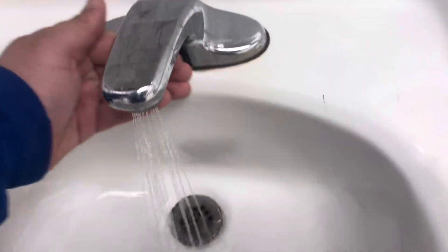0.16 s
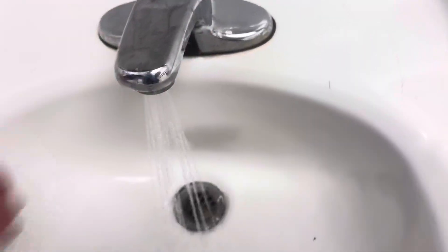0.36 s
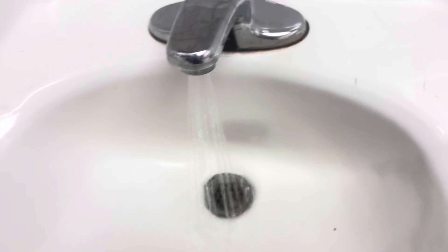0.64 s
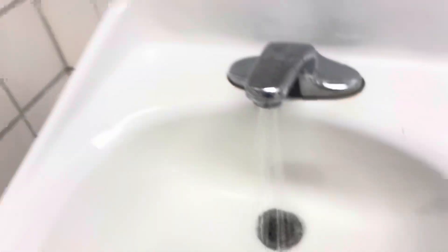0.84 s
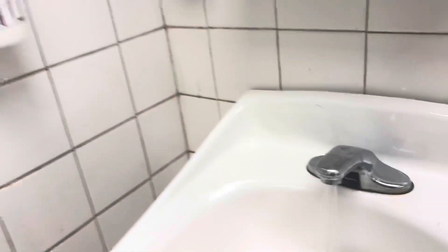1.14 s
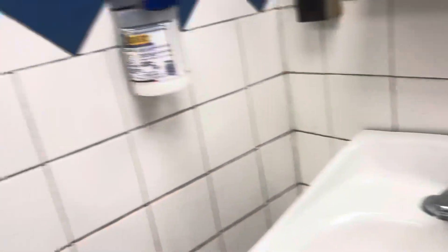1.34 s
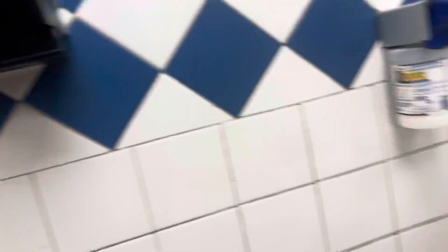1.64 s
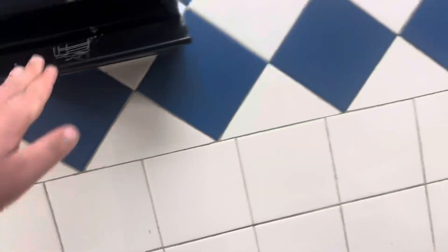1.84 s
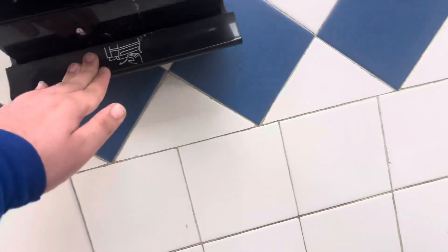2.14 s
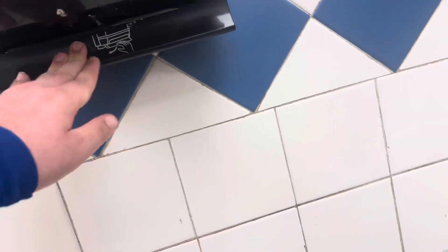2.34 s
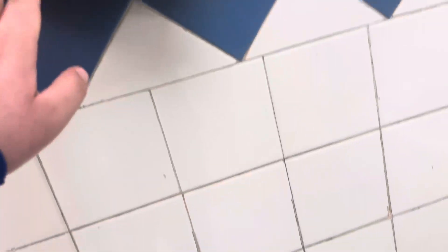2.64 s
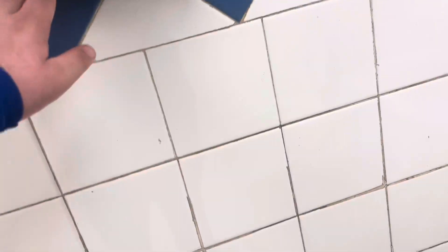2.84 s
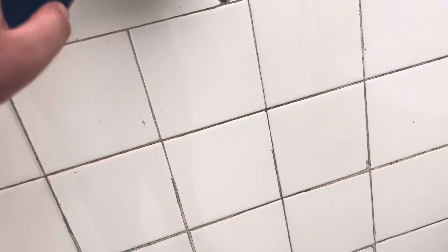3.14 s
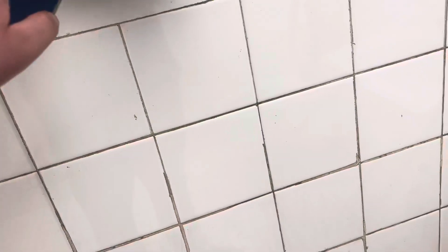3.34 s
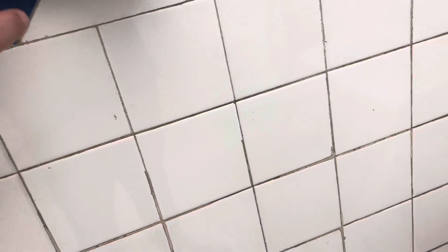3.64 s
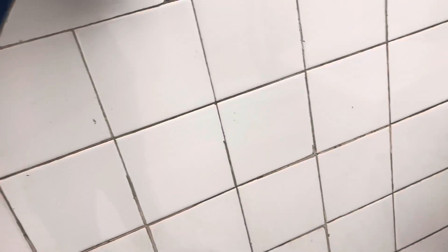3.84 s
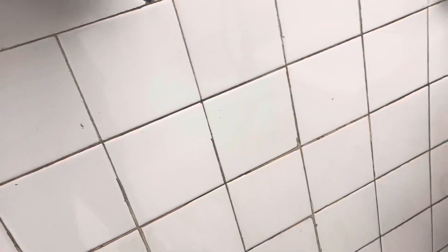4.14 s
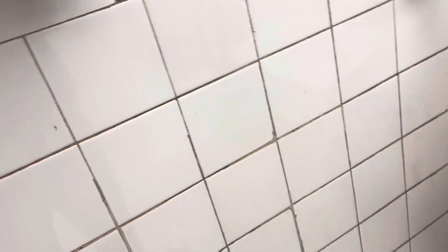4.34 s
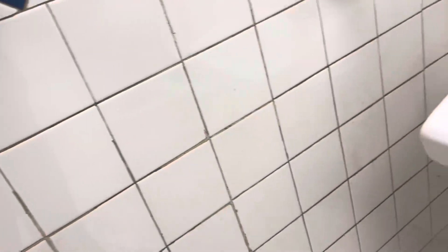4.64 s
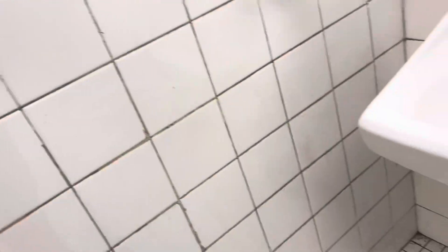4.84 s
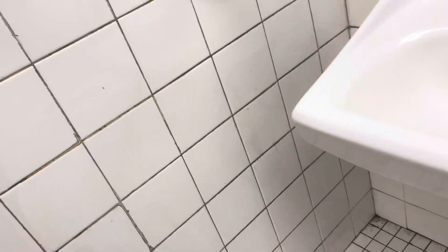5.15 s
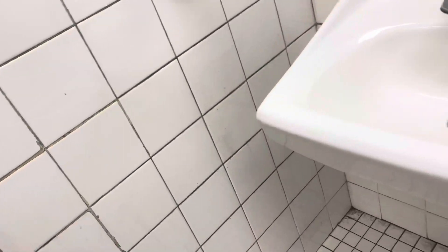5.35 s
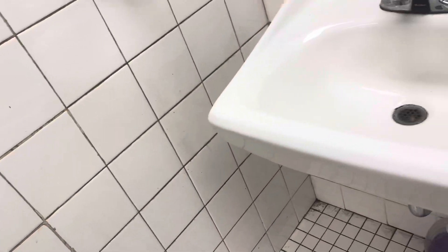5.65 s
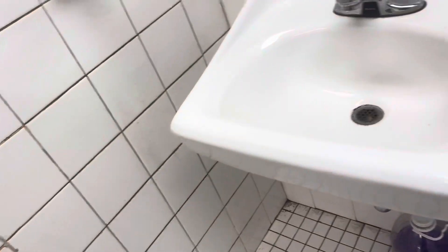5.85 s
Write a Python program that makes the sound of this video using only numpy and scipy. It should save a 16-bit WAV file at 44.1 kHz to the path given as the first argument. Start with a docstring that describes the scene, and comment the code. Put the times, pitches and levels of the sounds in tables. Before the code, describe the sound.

Tap water sprays and plinks in a small tiled washroom, then a plastic dispenser rattles and bangs hard twice, followed by sharp snaps and rustling.

```python
"""A small tiled washroom: a wall dispenser's lever is worked, and its housing knocks, rumbles and rasps.
Its loose cover clunks in ringing modes. Paper rustles as crackling noise and snaps in short noise cracks.
A tap sprays as coloured noise while the listener turns away; drain modes plink, bubbles rise in pitch.
Short squeaking tones, perhaps a sole, slide into pitch, and a ventilation rumble lies under all.
Left and right differ in phase, likeness and level by frequency."""
import sys
import numpy as np
from scipy import signal
from scipy.fft import rfft, irfft, next_fast_len
from scipy.io import wavfile
from scipy.ndimage import uniform_filter1d

SR = 44100
rng = np.random.default_rng(int(sys.argv[2]) if len(sys.argv) > 2 else 0)


def store_pcm(level_fs):
    """Save levels as 16-bit WAV."""
    pcm = np.round(np.clip(level_fs, -1, 1) * 32767).astype(np.int16)
    wavfile.write(sys.argv[1], SR, np.atleast_2d(pcm).T)


N = 264159  # length of the scene [samples]

# Blows on the housing: (time [s], level [dB], crack against level [dB], tick against level [dB],
# centre of the modes rung [Hz], spread of those modes [octaves])
KNOCKS = [(1.931, -22, -6, -9.5, 520, 0.63), (1.94, -20.5, -12, -23, 610, 0.37),
          (2.052, -27.5, -4, -19, 900, 0.21), (2.056, -20.5, -25, -31, 237, 0.42),
          (2.077, -27, -23, -11, 257, 0.24), (2.122, -27, -37, -7, 257, 0.54),
          (2.265, -29.5, -12, -12, 232, 0.37), (2.455, -25, -32, -32, 270, 0.43),
          (2.481, -40, -8, -6, 504, 0.52), (2.51, -26.5, -33, -23, 236, 0.28),
          (2.683, -29, -21, -22, 406, 0.99), (2.745, -12.5, -17, -21.5, 464, 0.32),
          (2.771, -5.5, -12, -19, 414, 0.62), (2.793, -5.5, -10.5, -15.5, 450, 0.47),
          (2.807, -3, -10, -8.5, 494, 0.48), (2.833, -15.5, -3.5, -39, 188, 0.34),
          (2.861, -21.5, -9, -25, 300, 0.76), (2.908, -20, -13, -30, 490, 0.26),
          (3.261, -29, -5, -12, 247, 0.41), (3.356, -27, 5.5, -8, 875, 0.4),
          (3.362, -15, -12, -30, 240, 0.77), (3.389, -14, -4, -11, 423, 0.48),
          (3.437, -18, -10, -21, 600, 0.14), (3.453, -4.5, -15, -12.5, 433, 1.17),
          (3.461, -12, -13, -30, 597, 0.48), (3.476, -15, -15, -32, 387, 0.45),
          (3.502, -17, -16, -31, 358, 0.37), (4.03, -44.5, -4, -3, 400, 0.51),
          (4.139, -30, -13, -7, 275, 0.77)]
# Ringing modes of the plastic housing while grinding: (frequency [Hz], level [dB], time to die by 60 dB [s])
HOUSING_MODES = [(92.2, 8.5, 0.44), (156.9, 1, 0.21), (188, -9.5, 0.2), (235, 1, 0.089), (270, -2, 0.17),
                 (310.4, -7, 0.1), (344, 2, 0.058), (384.7, -3.5, 0.18), (454.3, 1, 0.16),
                 (534.6, 1.5, 0.067), (560, 1, 0.065), (625, 1.5, 0.094), (716, 3.5, 0.054),
                 (846, -7, 0.11), (926, -8, 0.1), (1030, -5.5, 0.15), (1260, 2, 0.053), (1382, -8.5, 0.078),
                 (1560, -11, 0.062), (1700, -11.5, 0.05), (1946, -1.5, 0.048), (2160, -14, 0.086),
                 (2386, -7, 0.094), (2700, -7, 0.066), (2960, -22, 0.036)]
# Spray of the tap until it shuts off: (time [s], level [dB], part under 2 kHz against the rest [dB])
SPRAY = [(0.0, -29.5, 11), (0.65, -31.5, 12), (1.0, -32, 7.5), (1.35, -34, 4.5), (1.69, -40.5, 7),
         (2.0, -40.5, 12), (2.26, -55, 27)]


def amp(db):
    """Turn decibels into a plain factor."""
    return 10 ** (np.asarray(db) / 20)


def evened(x):
    """Scale a signal to an average (rms) level of 1."""
    return x / np.sqrt(np.mean(x ** 2) + 1e-20)


def read(points, hz, axis=1):
    """Read a column of a spectrum table, with straight lines on a log-frequency axis."""
    table = np.transpose(points)
    return np.interp(np.log(hz + 1), np.log(table[0] + 1), table[axis])


def curve(rows, axis=1):
    """Read a column of a time table at every sample."""
    table = np.transpose(rows)
    return np.interp(np.arange(N) / SR, table[0], table[axis])


def during(rows, fade=0.02):
    """One while the table lasts, fading to zero outside it over fade seconds."""
    t = np.arange(N) / SR
    inside = np.minimum(t - rows[0][0], rows[-1][0] - t)
    return np.clip(inside / fade + 1, 0, 1)


def hiss(colour, patchy_db, flicker_db, size=512, streak_db=0.):
    """Two unrelated noises of one colour, sharing patches, streaks and wide-band flicker."""
    frames, hz = 4 * N // size + 5, np.fft.rfftfreq(size, 1 / SR)
    a, b, c, d, patches = rng.standard_normal((frames, len(hz), 5)).T
    flicker = evened(uniform_filter1d(patches.mean(0), size=3))
    streaks = evened(uniform_filter1d(patches, size=60, axis=1))  # narrow bands that stand out for a while
    patches = uniform_filter1d(patches, size=6, axis=0)
    patches = evened(uniform_filter1d(patches, size=14, axis=1))
    level_db = read(colour, hz)[:, None] + patchy_db * patches + flicker_db * flicker + streak_db * streaks
    spectra = np.array([a + 1j * b, c + 1j * d]) * amp(level_db)
    noises = signal.istft(spectra, nperseg=size, noverlap=3 * size // 4)[1]
    return evened(noises[:, :N])


def clicks(per_s, spread_db):
    """A random train of clicks, a few of them large."""
    size = amp(spread_db * np.minimum(rng.exponential(1, N), 4))
    sign = rng.choice([-1., 1.], N)
    return size * sign * (rng.random(N) < per_s / SR)


def band(x, lo_hz, hi_hz):
    """Keep the sound between two frequencies, the upper one at most 20 kHz."""
    sos = signal.butter(2, [lo_hz, min(hi_hz, 20000)], "band", fs=SR, output="sos")
    return signal.sosfilt(sos, x)


def ring(modes, centre_hz, octaves, blow_s, twin=0.32):
    """Modes near centre_hz swell over a blow of blow_s and beat unevenly as they die; peak 1."""
    hz, db, t60 = np.transpose(modes)[:, :, None]
    t = np.arange(SR // 3) / SR
    near_db = -6 * (np.log2(hz / centre_hz) / octaves) ** 2
    phase, detune = rng.random((2, len(hz), 1))
    # each mode has a close weaker twin
    beat = 1 + twin * np.cos(2 * np.pi * (0.0734 * hz * detune * t + phase))
    rise = 1 - np.exp(-(t * hz / centre_hz / max(blow_s, 1e-4)) ** 2)  # low modes build up later
    tone = np.sin(2 * np.pi * (hz * t + phase))
    sound = (amp(db + near_db - 60 * t / t60) * rise * beat * tone).sum(0)
    return sound / abs(sound).max()


def burst(length_s, lo_hz, hi_hz):
    """A crack of noise that dies away at the pace of length_s; peak 1."""
    t = np.arange(3000) / SR
    fade = np.exp(-t / max(length_s, 2e-4))
    sound = band(rng.standard_normal(3000) * fade, lo_hz, hi_hz)
    return sound / abs(sound).max()


def add(mix, s, sound):
    """Mix a sound in at second s, cut off at the end of the mix."""
    part = mix[round(s * SR):][:len(sound)]
    part += sound[:len(part)]


def strokes():
    """Each stroke of lever and roll bites, eases off and stops; knocks shake loose puffs of rasp."""
    # Grinding in the housing: (start [s], length [s], rumble level [dB], rasp against rumble [dB],
    # share of the upper modes at the start [0-1])
    stroke_rows = [(1.818, 0.099, -47.5, -4.5, 0.5), (1.937, 0.051, -41, -8, 0),
                   (2.044, 0.25, -34.5, -10.5, 0.53), (2.41, 0.21, -43, -10.5, .4),
                   (2.667, 0.096, -43.5, -8.5, 0.4), (2.739, 0.38, -28.5, -8, 0.47),
                   (3.254, 0.22, -37.5, -13, 0.38), (3.35, 0.13, -20, -13.5, 0.4),
                   (3.485, 0.39, -30, -10, 0.3), (4.13, 0.052, -38.5, -11.5, 0.3),
                   (5.524, 0.15, -41.5, -7, 0.37)]
    grip_s, sag_db_per_s, let_go_db_per_s = 0.0052, 9.5, 216
    rasp_sag_db_per_s, dull_s = 28, 0.17  # the rasp and the upper modes give out sooner than the rumble
    jolt_db, jolt_t60_s = -5.5, 0.18  # puff of rasp, relative to the knock's tick
    t = np.arange(N) / SR
    power = np.zeros((3, N))  # low rumble, upper rumble, rasp
    for s, length, db, rasp_db, share in stroke_rows:
        since = np.maximum(t - s, 0)
        fall_db = sag_db_per_s * since + let_go_db_per_s * np.maximum(since - length, 0)
        level = np.minimum(since / grip_s, 1) * amp(db - fall_db)
        upper = np.clip(share, 0, 1) * np.exp(-since / dull_s)
        rasp = amp(rasp_db - rasp_sag_db_per_s * since) ** 2
        power += level ** 2 * np.array([1 - upper, upper, rasp])
    for s, db, _, tick_db, *_ in KNOCKS:
        puff_db = db + tick_db + jolt_db - 60 * np.maximum(t - s, 0) / jolt_t60_s
        power[2] += (t > s) * amp(puff_db) ** 2
    return np.sqrt(power)


def grinding():
    """Slipping gears shake two groups of housing modes, and a noisy rasp goes along."""
    # Colour of the rasp: (frequency [Hz], level per Hz [dB])
    rasp_colour = [(530, -40), (900, 5), (1260, -4), (2000, -7), (2300, -9.5), (2700, -6), (3500, -13.5),
                   (4800, -14), (9000, -38), (11700, -60), (19800, -120)]
    slips = clicks(500, spread_db=4.5)
    low, high = (
        evened(signal.oaconvolve(slips, ring(HOUSING_MODES, hz, octaves=0.67, blow_s=0.00055))[:N])
        for hz in (220, 560))
    rasp = hiss(rasp_colour, patchy_db=2.5, flicker_db=1.5, size=256)[0]
    return (strokes() * np.array([low, high, rasp])).sum(0)


def knocks():
    """A blow rings low housing modes, cracks high ones, and adds a thud and a tick of noise."""
    mode_spread = 0.022  # each knock's modes vary at random in pitch by up to this share
    out = np.zeros(N)
    for s, db, crack_db, tick_db, hz, octaves in KNOCKS:
        varied_modes = np.array(HOUSING_MODES) * [1, 1, .8]  # they die sooner than while grinding
        varied_modes[:, 0] *= 1 + mode_spread * rng.uniform(-1, 1, len(varied_modes))
        add(out, s, amp(db + 0.5) * ring(varied_modes, hz, octaves, blow_s=0.0023))
        add(out, s, amp(db - 9) * burst(0.015, hz / 2, hz * 2))  # dull thud
        add(out, s, amp(db + crack_db) * ring(varied_modes, 1600, octaves=.8, blow_s=.001))
        add(out, s, amp(db + crack_db - 5.5) * burst(0.0064, 1100, 4400))
        add(out, s, amp(db + tick_db) * burst(0.0059, 2500, 12900))
    return out


def dispenser():
    """Grinding and knocks leave through a small housing, which radiates little bass."""
    return band(grinding() + knocks(), 53, 22000)


def cover():
    """Each hollow clunk of the loose cover rings some of its clear modes."""
    # Clunks: (time [s], level [dB], centre of the modes rung [Hz], spread of those modes [octaves])
    clunk_rows = [(4.041, -44, 645, 0.31), (4.055, -32, 215, 0.39), (4.139, -28, 1290, 1.1),
                  (4.142, -31, 650, 0.38), (4.147, -22, 290, 0.75), (4.172, -30.5, 700, 0.54),
                  (4.18, -31, 198, 0.43)]
    # Ringing modes of the cover: (frequency [Hz], level [dB], time to die by 60 dB [s])
    cover_modes = [(151.4, 4.5, 0.57), (215, 2.5, 0.13), (290, 2.5, 0.11), (333, -12.5, 0.49),
                   (642, 1, 0.17), (738, -2, 0.078), (1080, -2.5, 0.15), (1370, -5.5, 0.12),
                   (1464, -5, 0.16), (1820, -4, 0.093), (2080, -6, 0.11), (2220, -2.5, .06),
                   (2450, -14, 0.11), (2800, -20, 0.049)]
    out = np.zeros(N)
    for s, db, hz, octaves in clunk_rows:
        add(out, s, amp(db) * ring(cover_modes, hz, octaves, blow_s=0.0027, twin=0.28))
    return out


def paper():
    """A faint soft hiss, then snaps: each is a burst of noise with a few short rings."""
    # A faint soft hiss just before the snap, then snaps: (time [s], level [dB], burst length [s],
    # lowest frequency of the burst [Hz], body against level [dB])
    burst_rows = [(4.881, -45.5, 0.0088, 3000, -1), (4.913, -22, 0.0091, 1500, -25),
                  (4.918, -14, 0.0017, 2550, -21), (4.922, -17, 0.0074, 1340, 0),
                  (5.292, -55, 0.0048, 3000, -20), (5.332, -49, .006, 7000, -23),
                  (5.523, -13.5, 0.0014, 10400, -24)]
    # Short rings of the paper: (frequency [Hz], level [dB], time to die by 60 dB [s])
    paper_modes = [(745, -1, .05), (830, -5, .035), (950, -10, .02), (1100, -11, .025), (1500, -15, .02),
                   (1950, -1, .022), (2150, 0, .02), (2450, -7, .02), (2850, -8, .025), (3400, -8, .02),
                   (3800, -2, .022), (4200, 1, .022), (5140, -6, .015)]
    out = np.zeros(N)
    for s, db, length_s, lo_hz, body_db in burst_rows:
        add(out, s, amp(db) * burst(length_s, lo_hz, 16700))
        add(out, s, amp(db + body_db) * ring(paper_modes, 2000, octaves=3.5, blow_s=.003, twin=.9))
        add(out, s, amp(db + body_db - 11) * burst(.012, 600, 5000))
    return out


def rustle():
    """Paper or sleeve rubs as soft noise with fine crackle, swelling with each movement."""
    # Swells: (time of the peak [s], level [dB], rise over 20 dB [s], hold [s], fall over 20 dB [s])
    swells = [(2.143, -40.5, 0.15, 0.115, 0.032), (2.292, -58, 0.043, 0.11, 0.33),
              (2.497, -54, 0.21, 0.062, 0.085), (2.785, -41.5, 0.13, 0.034, 0.1),
              (3.024, -54, 0.26, 0.11, 0.12), (3.324, -47, 0.046, 0.045, 0.22),
              (3.457, -41, 0.17, .01, 0.1), (3.64, -51.5, 0.11, 0.17, 0.12),
              (4.019, -55, 0.015, 0.011, 0.12), (4.34, -55, 0.33, 0.049, 0.37),
              (4.558, -50, 0.1, 0.013, 0.088), (4.655, -54.5, 0.048, 0.013, 0.26),
              (4.913, -53, 0.02, 0.017, 0.13), (5.02, -58, .05, 0.022, 0.22),
              (5.11, -66, 0.11, 0.031, 0.066), (5.285, -76, 0.014, 0.013, 0.031),
              (5.381, -49.5, 0.017, 0.041, 0.11), (5.447, -37, 0.073, 0.14, 0.088),
              (5.95, -68, 0.13, .05, 0.093)]
    # Colour of the rubbing: (frequency [Hz], level per Hz [dB])
    rub_colour = [(100, -9), (220, -1.5), (550, -2), (1200, -4.5), (3000, -7), (4800, -7), (7000, -10),
                  (10000, -5), (13000, -5.5), (15500, -36)]
    roundness, faint_db = 0.84, -71  # shape of a swell; rubbing that never quite stops
    crackle = evened(band(clicks(830, spread_db=3.0), 2900, 14700))
    rub = hiss(rub_colour, patchy_db=1.5, flicker_db=1.2, size=256, streak_db=1.5)
    t = np.arange(N) / SR
    power = amp(faint_db) ** 2
    for s, db, rise, hold, fall in swells:
        away = np.maximum((s - t) / rise, np.maximum(t - s - hold, 0) / fall)
        power = power + amp(db - 20 * away ** roundness) ** 2
    return np.sqrt(power) * (rub + 0.058 * crackle)


def tap():
    """Fine jets fizz on the porcelain; splash body and fizz shift balance as the listener turns."""
    # Colour of the fizz: (frequency [Hz], level per Hz [dB])
    fizz_colour = [(150, -92), (300, -18.5), (700, -17.5), (1300, -18.5), (2200, -17), (3000, -13),
                   (4400, -7), (6700, -13), (8500, -4), (10000, -8), (12200, -0.5), (14000, -10),
                   (15500, -16)]
    spray = hiss(fizz_colour, patchy_db=1.5, flicker_db=0.34, streak_db=0.5)
    body = signal.sosfilt(signal.butter(2, 2000, fs=SR, output="sos"), spray)
    fizz = spray - body
    balanced = amp(curve(SPRAY, axis=2)) * body + fizz
    return amp(curve(SPRAY)) * during(SPRAY) * balanced


def drain():
    """Plinks ring a few modes of the basin each; small drips keep others stirring."""
    # Modes of basin and drain pipe: (frequency [Hz], level [dB], typical time to die by 60 dB [s])
    basin_modes = [(260, -4, .25), (310, -4, .2), (345, -5, .22), (425, -4, .2), (520, -12, .1),
                   (610, -8, .1), (652, -1, .19), (690, -11, .08), (780, -13, .08), (940, -12, .12),
                   (1020, -9, .08), (1075, -4, .085)]
    # Plinks: (time [s], level [dB], centre of the modes rung [Hz], spread of those modes [octaves])
    plink_rows = [(.374, -29, 654, 0.15), (0.375, -27, 1090, 0.13), (0.402, -36.5, 354, 0.12),
                  (.42, -34, 1080, 0.15), (.456, -25, 650, 0.14), (0.501, -29, 1080, 0.18),
                  (.545, -25.5, 270, 0.19), (.557, -24.5, 644, 0.16), (.583, -25.5, 645, 0.23),
                  (.64, -31.5, 346, 0.3), (0.741, -33, 1070, 0.098), (.797, -31.5, 640, 0.14),
                  (0.886, -31, 1030, 0.14), (.923, -25, 545, 0.37), (0.975, -34, 1065, 0.11),
                  (1.01, -32.5, 630, 0.2), (1.091, -34, 406, 0.51), (1.119, -31.5, 376, 0.37),
                  (1.168, -35.5, 1080, 0.075), (1.268, -36.5, 424, 0.53), (1.419, -24, 640, 0.59),
                  (1.489, -48, 354, 0.23), (1.68, -31.5, 640, 0.98), (1.827, -28.5, 400, 0.48),
                  (1.831, -39, 1060, .12), (1.859, -49, 1080, 0.074), (1.889, -48, 1060, .1),
                  (2.288, -36.5, 1090, 0.072), (2.409, -43.5, 1080, 0.29)]
    out = np.zeros(N)
    # each plink varies at random in pitch and damping, by these shares at most
    variation = 1 + rng.uniform(-1, 1, (len(plink_rows), 2)) * [.018, .3]
    for (s, db, hz, octaves), (shift, life) in zip(plink_rows, variation):
        varied_modes = basin_modes * np.array([shift, 1, life])
        add(out, s, amp(db) * ring(varied_modes, hz, octaves, blow_s=0.001, twin=0.62))
    drip = ring(basin_modes, 355, octaves=0.5, blow_s=0.0021)
    drips = signal.oaconvolve(clicks(66, spread_db=3.), drip)[:N]
    return out + amp(-50) * evened(drips) * during(SPRAY, fade=0.99)


def bubbles():
    """Air pockets of many sizes each ring briefly with rising pitch, fading with the spray."""
    out, t = np.zeros(N), np.arange(2500) / SR
    for hz in np.geomspace(450, 1700, num=16):  # starting pitch for each size
        tone = np.sin(2 * np.pi * hz * t * (1 + 3.8 * t))
        plop = tone * np.exp(-t * hz / 6.9) * (1 - np.exp(-t / 0.0083))
        out += signal.oaconvolve(clicks(5.1, spread_db=4.0), plop)[:N]
    level_db = -52.5 + .5 * (curve(SPRAY) - SPRAY[0][1])  # falls half as many dB as the spray
    return amp(level_db) * during(SPRAY) * evened(out)


def squeaks():
    """A tone with two overtones slides into pitch, is held and wavers as it fades."""
    # Squeaks, perhaps a sole on the tiles: (time [s], level [dB], pitch [Hz],
    # slide up into pitch [share of it, negative is down], overtones against level [dB],
    # hold [s], time to die by 60 dB [s])
    squeak_rows = [(1.291, -51, 1900, -0.02, -28, .03, 0.08), (1.368, -45, 1600, -0.054, -13, 0.066, 0.08),
                   (1.419, -36, 1905, 0.1, -4, 0.035, 0.05), (1.461, -40.5, 1900, 0.036, -11, 0.024, 0.044),
                   (1.503, -44, 1860, .03, -25, 0.0099, 0.062), (1.539, -52, 1880, 0.0088, -25, 0.03, 0.11),
                   (1.672, -38, 1553, 0.037, -30, 0.0092, 0.062),
                   (1.698, -40.5, 1550, -0.0049, -32, 0.012, 0.091)]
    slide_s = 0.012
    out, t = np.zeros(N), np.arange(SR // 4) / SR
    for s, db, hz, slide, octave_db, hold, t60 in squeak_rows:
        waver = evened(uniform_filter1d(rng.standard_normal(len(t)), size=300))
        pitch = hz * (1 - slide * np.exp(-t / slide_s) + .011 * waver)
        turn = 2 * np.pi * np.cumsum(pitch) / SR
        level_db = db - 60 * np.maximum(t - hold, 0) / t60 + 2.0 * waver[::-1]
        shape = (1 - np.exp(-t / 0.003)) * amp(level_db)
        late = 1 - np.exp(-(t / 0.02) ** 2)  # the overtones set in later
        overtones = np.sin(2 * turn) + 0.2 * np.sin(3 * turn)
        add(out, s, shape * (np.sin(turn) + late * amp(octave_db) * overtones))
    return out


def fan():
    """Ventilation rumbles as low noise, with air modes of the small room standing out of it."""
    # Colour of the rumble: (frequency [Hz], level per Hz [dB])
    hum_colour = [(13, -52), (22, -7.5), (76, 4.5), (129, -12.5), (260, -10), (312, -8.5), (408, -13),
                  (533, -15.5), (788, -22.5), (1830, -32), (2030, -34), (2250, -34.5), (3000, -37),
                  (3900, -78), (6600, -120)]
    # Air modes stirred by the fan: (frequency [Hz], width [Hz], level [dB])
    air_modes = [(58.8, 11.6, -52), (88.1, 17, -54.5), (152, 18.7, -56), (234.9, 7.5, -64.5)]
    out = amp(-45.5) * hiss(hum_colour, patchy_db=2.5, flicker_db=2.2, size=2048)
    for hz, width, db in air_modes:
        tone = band(rng.standard_normal(N), hz - width / 2, hz + width / 2)
        out = out + amp(db) * evened(tone)
    return out


def room(x, wet_db):
    """Tiles add a sparse dying tail to the direct sound, and another tail to a scattered twin."""
    # Echo of the tiles: (frequency [Hz], time to die by 60 dB [s])
    tile_decay = [(100, 0.42), (260, 0.68), (700, 0.52), (1840, 0.34), (4850, 0.22), (12800, 0.32)]
    taps = np.zeros((2, SR))
    at = np.arange(120, SR - 20, 20) + rng.integers(0, 20, (2, (SR - 121) // 20))
    np.put_along_axis(taps, at, rng.choice([-1., 1.], at.shape), 1)
    hz, t, z = signal.stft(taps, SR, nperseg=256)
    fade = amp(-60 * t / read(tile_decay, hz)[:, None])
    tail = signal.istft(z * fade, SR, nperseg=256)[1][:, :SR]
    tail = amp(wet_db) * tail / np.linalg.norm(tail[0])
    scatter = irfft(np.exp(2j * np.pi * rng.random(129)))  # flat in level, scrambled in phase
    direct = np.array([np.arange(256) == 0, scatter])
    whole = tail + np.pad(direct, ((0, 0), (0, SR - 256)))
    return signal.fftconvolve(x[None], whole, axes=1)[:, :N]


def stereo(pair, left_db):
    """Left takes the first sound; right a like share of it, phase turned, and the rest from its twin."""
    # Stereo spread: (frequency [Hz], half the phase by which left lags [rad], likeness [0-1],
    # left over right before left_db is added [dB])
    spread_rows = [(60, -0.1, 0.98, 1), (275, 0.0, 0.84, 2.5), (600, 0.05, 0.68, 3), (960, 0.2, 0.35, 1),
                   (1500, 0.95, 0.5, -0.5), (1900, 0.65, 0.7, -1), (2300, 0.3, 0.55, 0.5),
                   (2900, -0.15, 0.65, 2), (3600, -0.2, 0.7, 3), (4500, -0.05, 0.78, 3),
                   (5700, 0.15, 0.62, 2.5), (7300, 0.08, 0.9, 1), (8100, 0.35, 0.8, 1),
                   (8900, 1.05, 0.85, 1), (9250, 1.5, 0.995, 1), (10700, 1.64, 0.995, 1),
                   (11200, 2.2, 0.9, 1), (12100, 3.05, 0.85, 1), (13700, 3.2, 0.82, 1.5),
                   (14600, 4.4, 0.85, 0)]
    size = next_fast_len(N + 4096)
    hz, (first, twin) = np.fft.rfftfreq(size, 1 / SR), rfft(pair, size)
    turn = read(spread_rows, hz, axis=1)
    like = np.clip(read(spread_rows, hz, axis=2), 0, 1)
    lean = amp((read(spread_rows, hz, axis=3) + left_db) / 2)
    left = first * np.exp(-1j * turn) * lean
    right = (like * first + np.sqrt(1 - like ** 2) * twin) * np.exp(1j * turn) / lean
    return irfft(np.array([left, right]), size)[:, :N]


def scene():
    """Give the sources their echo and each group its balance between left and right."""
    housing = room(dispenser() + cover(), wet_db=-6)
    hands = rustle() + room(paper(), wet_db=-7)
    near_basin = room(drain() + bubbles() + squeaks(), wet_db=-8)
    out = stereo(housing, left_db=-0.7)
    out = out + stereo(hands + tap() + fan(), left_db=-1.1)
    return out + stereo(near_basin, left_db=-3.5)


def record(dry):
    """The loudest blows are rounded off softly; then the recorder's band limit removes the top treble."""
    rounded = 1.1 * np.tanh(dry / 1.1)
    edge_hz = 15100
    low_pass = signal.firwin(511, edge_hz, window=("kaiser", 9), fs=SR)
    return signal.oaconvolve(rounded, low_pass[None], "same")


dry = scene()
out = record(dry)
store_pcm(out)
```